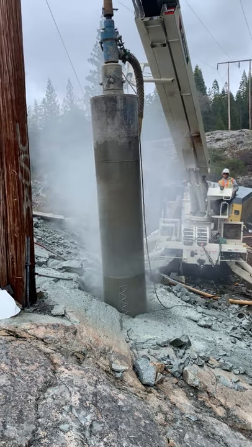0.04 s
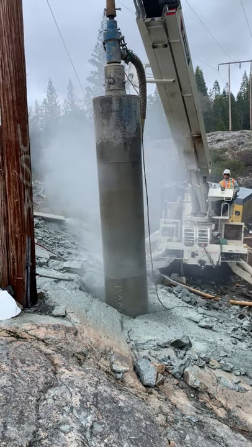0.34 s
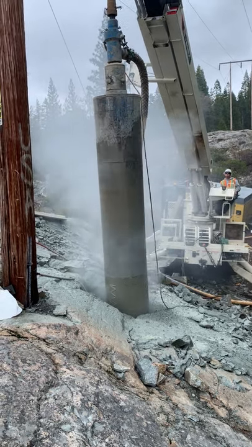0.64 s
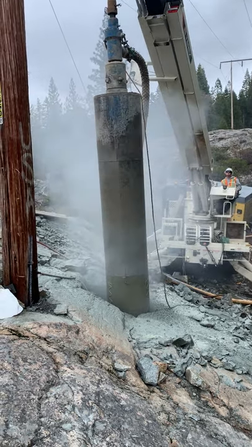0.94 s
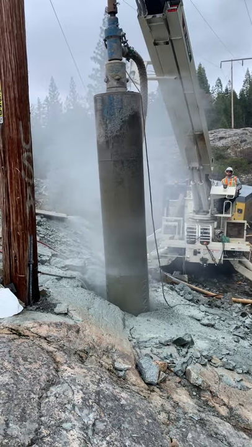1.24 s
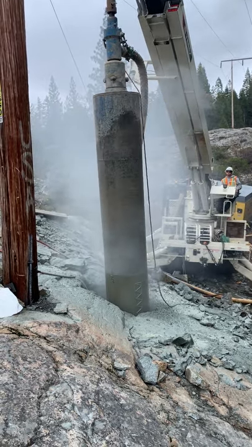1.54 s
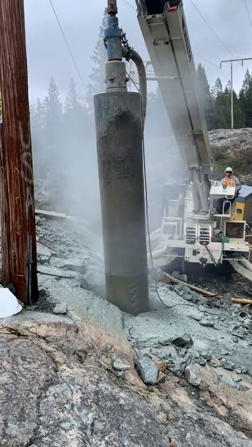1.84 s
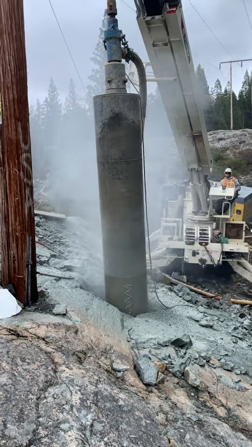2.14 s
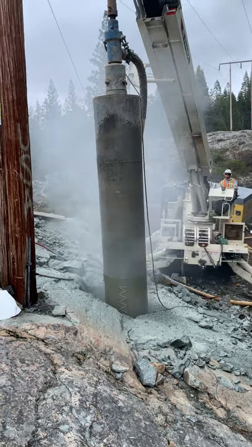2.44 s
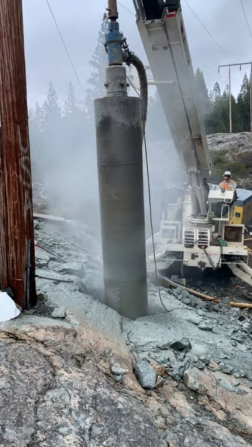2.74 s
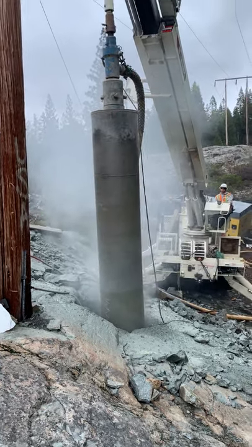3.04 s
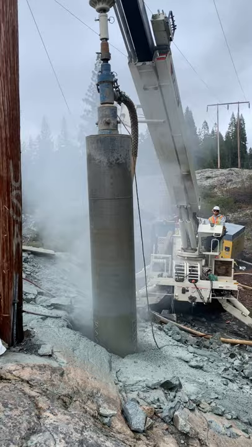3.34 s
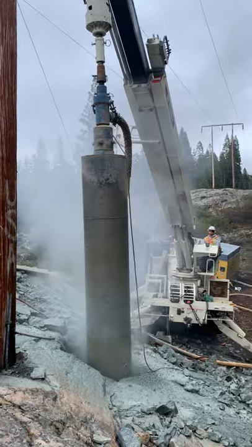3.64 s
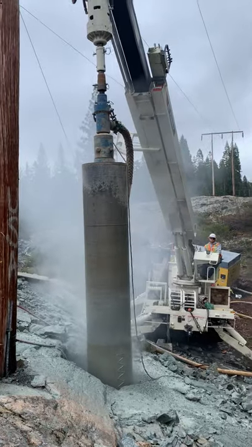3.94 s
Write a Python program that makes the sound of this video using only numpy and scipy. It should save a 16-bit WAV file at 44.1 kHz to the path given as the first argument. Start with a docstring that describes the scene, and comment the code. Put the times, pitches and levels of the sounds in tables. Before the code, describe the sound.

A large pneumatic hammer drill pounds rock outdoors for the full four seconds, about nineteen blows a second, hardest in the first 0.3 seconds. The blows boom and crunch, with rattling, ringing steel, irregular hollow knocks and short hisses. Compressed air roars underneath with a diesel drone and faint hydraulic whine. Brief thin metal scrapes sound near the start, between 1 and 1.4 seconds, and around 3.4 seconds.

```python
"""A large pneumatic hammer drill pounds rock outdoors, about 19 blows a second with weaker rebounds.
Each strike sends a bending wave down the steel casing (a falling chirp), booms through the ground,
cracks rock and rattles the steel. Hollow knocks sound on and between the blows, and scrapes make
the casing sing. Underneath, compressed air roars, a diesel drones and the hydraulics whine.
Two closely spaced microphone ports pick it all up."""
import sys
import numpy as np
from scipy import signal
from scipy.fft import rfft, irfft, next_fast_len
from scipy.io import wavfile
from scipy.ndimage import uniform_filter1d, minimum_filter1d, map_coordinates

SR = 44100
rng = np.random.default_rng(int(sys.argv[2]) if len(sys.argv) > 2 else 0)


def log_audio(samples):
    """Write samples as a 16-bit WAV file to the path given in sys.argv[1]."""
    # one column per channel
    frames = np.atleast_2d(samples).T
    # limit to full scale, then quantise
    limited = np.clip(frames, -1, 1)
    pcm = np.round(limited * 32767).astype(np.int16)
    wavfile.write(sys.argv[1], SR, pcm)


N = 176400


def amp(db):
    return 10 ** (np.asarray(db) / 20)


def unit(x):
    return x / np.sqrt(np.mean(x ** 2) + 1e-20)


def along(points, hz):
    """Read (f/Hz, value) points on a log frequency axis."""
    freqs, values = np.transpose(points)
    return np.interp(np.log(hz + 1), np.log(freqs + 1), values)


def fader(points):
    """One value per sample from (t/s, value) points."""
    return np.interp(np.arange(N) / SR, *np.transpose(points))


def wobble(rate):
    """Smooth random modulation, rate knots a second."""
    position = np.arange(N) * rate / SR
    knots = rng.standard_normal(int(position[-1]) + 4)
    fine = np.arange(0, len(knots) - 1, 1 / 8)
    return np.interp(position, fine, map_coordinates(knots, [fine]))


def filtered(x, response):
    """x through a complex frequency response."""
    size = next_fast_len(N + SR // 2)
    return irfft(rfft(x, size) * response(np.fft.rfftfreq(size, 1 / SR)), size)[..., :N]


def resonate(x, modes):
    """x through a bank of resonators (f/Hz, width/Hz, level/dB)."""
    return filtered(x, lambda f: sum(amp(db) * 1j * f * width / (hz * hz - f * f + 1j * f * width)
                                     for hz, width, db in modes))


def impulses(times, db):
    """One impulse per hit."""
    samples = np.clip(np.round(times * SR), 0, N).astype(int)
    return np.bincount(samples, amp(db), N + 1)[:N]


def bursts(times, db, decay_s, attack_s=0.0016):
    """Envelope of rms 1: each hit snaps up and dies away; overlapping hits add in power."""
    t = np.arange(SR // 4) / SR
    shape = (1 - np.exp(-t / attack_s)) * np.exp(-t / decay_s)
    power = signal.fftconvolve(impulses(times, db) ** 2, shape ** 2)[:N]
    return unit(np.sqrt(np.abs(power)))


def bending_wave(force, eq, travel_s=0.002215):
    """Highs outrun lows along the casing, so each hit chirps downward; travel_s holds at 1 kHz."""
    cycles = lambda hz: 2 * travel_s * np.sqrt(hz * 1000)
    return filtered(force, lambda hz: amp(along(eq, hz)) * np.exp(-2j * np.pi * cycles(hz)))


# stereo width of the noise, side relative to mid: f/Hz, level/dB
SIDE_EQ = [(80, -31), (250, -13), (600, -10.5), (2000, -13), (3500, -8.5), (4700, -82), (7000, -53),
           (9100, -40), (12000, -9.5)]

def white():
    """Near-white stereo noise, mostly common to both ports."""
    mid, side = rng.standard_normal((2, N))
    side = filtered(side, lambda hz: amp(along(SIDE_EQ, hz)))
    return unit(mid + np.array([side, -side]))


def noise(eq):
    """Stereo noise coloured by (f/Hz, level/dB) points, then brought to rms 1."""
    return unit(filtered(white(), lambda hz: amp(along(eq, hz))))


# fader ride of the pump whine: t/s, level/dB
WHINE_FADER = [(0, -24), (.28, -27.5), (.42, -37), (1.3, -37), (2, -39), (2.6, -36), (3.3, -33.5),
               (4, -33.5)]

def pump_whine(pitch_hz=977):
    """The hydraulic pump sings a thin, wavering tone."""
    phase = 2 * np.pi * np.cumsum(pitch_hz * (1 + 0.003 * wobble(20))) / SR
    return np.sqrt(2) * amp(fader(WHINE_FADER) + 2.8 * wobble(9)) * np.sin(phase)


# partials of the diesel: multiple of the firing rate, level/dB
DIESEL_PARTIALS = [(1, 2), (2, -4.5)]
# fader ride of its drone: t/s, level/dB
DIESEL_FADER = [(0, -19), (.3, -31.5), (.6, -24.5), (1, -33), (1.3, -29), (1.7, -22.5), (2, -28.5),
                (2.4, -33.5), (2.75, -37), (3, -35), (3.25, -50.5), (3.5, -25), (3.8, -38)]

def diesel(firing_hz=114):
    """The diesel drones at a slightly unsteady speed, swelling and fading."""
    phase = 2 * np.pi * np.cumsum(firing_hz * (1 + 0.0126 * wobble(6.06))) / SR
    level_db = fader(DIESEL_FADER) + wobble(13)
    return sum(np.sqrt(2) * amp(level_db + db) * np.sin(k * phase) for k, db in DIESEL_PARTIALS)


# colour of the low bed: f/Hz, level/dB
RUMBLE_EQ = [(20, -21), (45, -12.5), (75, 5), (110, 5.5), (150, 5), (220, 3.5), (300, 5), (380, -15.5),
             (700, -31)]

def rumble():
    """A steady low rumble sits under the rig."""
    return amp(-21) * noise(RUMBLE_EQ)


# colour of the exhaust air: f/Hz, level/dB
AIR_EQ = [(20, -44), (200, -3), (600, 3.5), (850, -5.5), (1300, -1.5), (2400, -7), (4000, -7.5),
          (5000, -14), (6500, -7.5), (7800, -10.5), (9000, -14), (12000, -17), (15500, -34)]
# fader ride of its roar: t/s, level/dB
AIR_FADER = [(0, -12), (.3, -17), (.65, -18.5), (1.2, -19), (2, -18), (2.8, -18.5), (3.4, -18.5),
             (4, -19.5)]

def air_roar(puff_share=0.51):
    """Exhaust air roars out of the hole, a share of its power puffing with each strike."""
    times, _, rattle_db = np.transpose(STRIKES)
    puffs = bursts(times, rattle_db, decay_s=0.0086)
    flow = np.sqrt(1 - puff_share + puff_share * puffs ** 2)
    return amp(fader(AIR_FADER)) * flow * noise(AIR_EQ)


# scrapes of the turning bit: centre t/s, length/s, f/Hz, level/dB
BIT_SCRAPES = [(0.087, 0.022, 6970, -14), (.49, .11, 2600, -30), (1.007, .06, 1906, -29),
               (1.26, 0.11, 3270, -32), (1.37, 0.089, 1902, -27.5), (3.392, 0.13, 7194, -26.5)]

def scrapes(pitch_waver=0.0038):
    """Steel rubs on rock and a single mode of the casing sings out briefly."""
    t = np.arange(N) / SR
    phase_per_hz = 2 * np.pi * np.cumsum(1 + pitch_waver * wobble(120)) / SR
    singing = 0
    for centre, length, hz, db in BIT_SCRAPES:
        swell = np.cos(np.pi * np.clip((t - centre) / length, -0.5, 0.5))
        singing += np.sqrt(2) * amp(db) * swell * np.sin(hz * phase_per_hz)
    return singing


# early blows under which a loose steel part clangs: t/s, level/dB
CLANG_HITS = [(.096, -5), (.178, 2), (.226, -1), (.277, -5)]
# partials of the clang: f/Hz, level/dB, t60/s
CLANG_PARTIALS = [(738, -21, 0.19), (659, -13, .1)]

def clangs():
    """A loose steel part clangs near 740 Hz under the first heavy blows."""
    t = np.arange(SR // 4) / SR
    ring = sum(amp(db) * 10 ** (-3 * t / t60) * np.sin(2 * np.pi * hz * t)
               for hz, db, t60 in CLANG_PARTIALS)
    return signal.fftconvolve(impulses(*np.transpose(CLANG_HITS)), ring)[:N]


# hollow mid-pitched knocks: t/s, level/dB
KNOCK_CUES = [(0.0722, 5), (0.1756, 6), (0.2133, 2), (0.2401, 4), (0.275, 4), (0.293, -6), (0.3837, -0.5),
              (0.4933, -3), (0.5435, -2), (0.5547, 1), (0.6677, -4), (0.8244, -7), (0.8676, 3),
              (0.8827, -8), (0.9155, -3), (0.9501, -1), (0.9877, -1), (1.0412, 0), (1.1091, -1),
              (1.1631, 4), (1.2005, 3), (1.3061, 2), (1.4061, -5), (1.5256, -7), (1.6865, 1.5),
              (1.7203, -1), (1.9298, -2), (2.0038, -4), (2.046, -4), (2.0588, 0), (2.0904, -2),
              (2.1894, -6), (2.3892, 3), (2.4421, 4), (2.5554, 1), (2.786, 1), (2.8496, 0), (2.8976, 0),
              (2.9468, 2), (3.0845, -5), (3.1048, -2), (3.2097, 10), (3.3684, 3.5), (3.4443, -3),
              (3.4737, 0), (3.5448, -6), (3.6853, -1.5), (3.6974, -4), (3.7406, 0), (3.79, 0), (3.8011, -2),
              (3.9706, -3)]
# colour of a knock: f/Hz, level/dB
KNOCK_EQ = [(150, -44), (300, -7.5), (420, -9.5), (570, 3.5), (720, -9.5), (1000, -14.5), (1350, -12.5),
            (2200, -32), (4000, -70)]
# hollow note of the air in the casing: f/Hz, width/Hz, level/dB
HOLLOW_MODE = [(590, 26, 4)]

def knocks(stones_per_s=45):
    """Hollow knocks near 570 Hz land on and between the blows; loose rock clatters on the casing."""
    stone_hits = rng.random(N) < stones_per_s / SR
    clatter = stone_hits * amp(-15.5) * rng.standard_normal(N)
    wave = bending_wave(impulses(*np.transpose(KNOCK_CUES)) + clatter, KNOCK_EQ)
    return amp(25.5) * (wave + resonate(wave, HOLLOW_MODE))


# colour of a spurt of air and chips: f/Hz, level/dB
SPURT_EQ = [(20, -70), (1200, -32), (2400, 0), (3300, -5.5), (4300, 1), (5200, 1), (6700, 4.5), (8500, 4),
            (12000, -14.5), (15500, -11)]
# fader ride of the spurts: t/s, level/dB
SPURT_FADER = [(0, -33), (.3, -26), (1, -25), (2, -32.5), (3.1, -28), (3.45, -22.5), (4, -26)]

def spurts():
    """Air and chips shoot out in a short, bright hiss at each strike."""
    times, _, rattle_db = np.transpose(STRIKES)
    return amp(fader(SPURT_FADER)) * bursts(times, rattle_db, decay_s=0.0075) * noise(SPURT_EQ)


# modes of the steel casing: f/Hz, width/Hz, level/dB
CASING_MODES = [(576, 32, 9), (735, 30, -4), (878, 30, 1), (980, 18, 6), (1266, 40, 3), (1335, 30, 0),
                (1510, 30, -1), (1790, 30, -1), (1906, 30, 3), (2092, 24, 2.5), (2649, 32, 6),
                (2900, 36, -4), (3165, 32, 2.5), (3278, 32, 2), (3630, 30, -1), (4059, 60, -4),
                (4630, 60, -4), (5297, 60, -5), (5704, 40, -4), (6040, 70, -2), (6406, 70, -3),
                (6590, 70, -3.5), (6760, 70, -5), (7015, 50, 2), (7194, 70, 1), (7477, 50, 1),
                (7560, 60, -4), (8032, 60, -5)]
# fader ride of its ring: t/s, level/dB
RING_FADER = [(0, -20), (.4, -18.5), (.8, -18), (1.2, -17.5), (1.6, -17), (2.2, -18), (2.8, -18),
              (3.4, -18), (4, -18)]

def casing_ring(drive, swell_db=3.0, swell_rate=18):
    """The steel rings; as the bit turns, each mode swells and fades at random."""
    ring = 0
    for hz, width, db in CASING_MODES:
        b, a = signal.iirpeak(hz, hz / width, SR)
        ring += amp(db + swell_db * wobble(swell_rate)) * signal.lfilter(b, a, drive)
    return amp(fader(RING_FADER)) * unit(ring)


# colour of rattling steel and chips: f/Hz, level/dB
RATTLE_EQ = [(20, -60), (500, -20), (1500, 0), (2400, -8), (3300, -3), (4200, -2), (4900, -4), (5500, -4),
             (6300, 1), (7500, 1), (8500, -3), (10000, -6.5), (12000, -10.5), (15500, -11)]

def rattle(lag_s=0.00023):
    """Steel and chips clatter just after each strike and set the casing ringing."""
    times, _, rattle_db = np.transpose(STRIKES)
    grain_db = 2.55 * wobble(600) + wobble(70)
    shake = unit(bursts(times + lag_s, rattle_db, decay_s=0.022) * amp(grain_db))
    return amp(-25.5) * shake * noise(RATTLE_EQ) + casing_ring(shake * white())


# colour of crushed rock: f/Hz, level/dB
CRUNCH_EQ = [(20, -50), (60, -34), (150, 3), (270, -6), (370, -1), (580, 0.5), (800, -16), (1350, -15),
             (1900, -12), (2500, -30), (6000, -50)]

def rock_crunch():
    """Rock crumbles under each strike in a short, grainy burst."""
    times, thud_db, _ = np.transpose(STRIKES)
    grain_db = 2.7 * wobble(500)
    envelope = bursts(times, thud_db, decay_s=0.014) * amp(grain_db)
    return amp(-23.5) * unit(envelope * noise(CRUNCH_EQ))


# colour of splitting rock: f/Hz, level/dB
CRACK_EQ = [(20, -70), (450, -25), (700, -7), (1050, -2), (1350, -4.5), (1700, -9.5), (2100, -7),
            (2600, -18), (6000, -60)]

def rock_crack():
    """The rock splits at the instant of each strike, giving it a sharp front edge."""
    times, _, rattle_db = np.transpose(STRIKES)
    return amp(-28.5) * bursts(times, rattle_db, decay_s=0.004) * noise(CRACK_EQ)


# resonances of the ground under the bit: f/Hz, width/Hz, level/dB
GROUND_MODES = [(38.2, 6, -8), (82, 17, -16), (91.8, 4.6, 7), (125.7, 10.6, 2), (200.2, 35, 6),
                (264, 13, -38)]
# fader ride of the boom: t/s, level/dB
BOOM_FADER = [(0, 2), (.3, -3), (.55, -0.5), (.8, 1), (1.05, 0.5), (1.27, -0.5), (1.5, 5.5), (1.75, 3),
              (2, -4), (2.25, 3), (2.5, 0), (2.75, 5), (3, -1.5), (3.25, 0.5), (3.5, -2.5), (3.75, 3),
              (4, -2.5)]

def ground_boom(force):
    """The ground answers the force of the bit with a deep boom."""
    return amp(24 + fader(BOOM_FADER)) * resonate(force, GROUND_MODES)


# low body of the casing's bending wave: f/Hz, level/dB
THUD_EQ = [(20, -46), (45, -13.5), (100, 2), (170, -3.5), (240, -4.5), (300, 1), (355, -22), (450, -12.5),
           (580, -1.5), (690, -17), (1000, -43), (1350, -27), (2000, -71)]
# hard steel-on-steel edge of the same wave: f/Hz, level/dB
CLANK_EQ = [(300, -40), (550, -12), (750, -5), (1050, -6), (1350, -2), (1650, -10), (2000, -16),
            (2500, -18), (4000, -24), (8000, -45)]
# fader ride of the clank: t/s, level/dB
CLANK_FADER = [(0, 27), (.3, 22.5), (.7, 21), (1.2, 19), (1.7, 17), (2.2, 24), (2.8, 23.5), (3.3, 19),
               (4, 19)]
# blows and rebounds, which also trigger the noise bursts: t/s, thud level/dB, rattle level/dB
STRIKES = [(0.0168, 13.5, 20), (0.0322, 20, 11), (0.0454, 14.5, 12), (0.0607, 19, 7), (0.0844, 2, -10),
           (0.0994, 4, 1), (0.124, 7, 2.5), (0.1392, 1, -15), (0.1571, 6, 1.5), (0.1788, 8.5, 6.5),
           (0.224, 3, 1.5), (0.239, -8, -0.5), (0.2757, 2, 3), (0.2885, 6, -2), (0.3284, 0, 3),
           (0.3444, 5.5, -6), (0.3817, -7, 2), (0.4001, 4.5, -4), (0.4363, 2, 4.5), (0.461, 3, -12),
           (0.49, -1, 4.5), (0.5187, 6.5, 0.5), (0.5432, -2, 3), (0.5575, 5, -31), (0.5777, -16, -3.5),
           (0.598, 5.5, 2), (0.6124, -4, -4), (0.639, -2, -5), (0.6519, 3, -0.5), (0.6653, -5, -19),
           (0.7059, 5, 1.5), (0.7592, 8.5, 3.5), (0.8137, 9, 2), (0.837, -7, -7), (0.8679, 2.5, 0.5),
           (0.9159, 5.5, 4.5), (0.9338, -3, -6), (0.9701, 4, 1.5), (0.99, -5, -10), (1.024, 5.5, 2.5),
           (1.0756, 5, 3), (1.0944, 1, -4), (1.1238, 3, 1), (1.1476, -3, -1), (1.1723, 3, 0.5),
           (1.1999, 2, 3), (1.2191, 4, -2), (1.245, -18, 1), (1.2687, 5, 0), (1.304, 1, 4.5),
           (1.3182, 4, -15), (1.3487, -8, -1), (1.3636, -3, -4), (1.3919, 0, -1), (1.4147, -1, -1.5),
           (1.45, -4, -5.5), (1.4636, 2, 0.5), (1.5096, 5.5, 1.5), (1.5633, -2, 3.5), (1.6166, -1, 2),
           (1.647, -46, -25), (1.6657, 2, -1.5), (1.686, -32, -2.5), (1.7165, 1, 0), (1.74, -12, -7),
           (1.7597, 2, 0), (1.79, -6, -1), (1.8064, 1, 0), (1.821, -0.5, -4), (1.8449, 2.5, 1.5),
           (1.8742, 3, -2.5), (1.8976, -3, 0), (1.9291, -2, -2), (1.955, -4, 0), (1.9842, 4, -6),
           (2.0001, -9, -0.5), (2.0364, 3.5, 1), (2.0881, 1, 1), (2.1132, 1, 0.5), (2.141, -0.5, -1),
           (2.1675, -6, -5.5), (2.1929, -2, 2.5), (2.2391, 0.5, 2), (2.296, 4.5, 0), (2.346, 2.5, 2),
           (2.361, -2, -4), (2.3999, -0.5, -1), (2.4393, -3, 1.5), (2.4515, 1, -16), (2.491, -5, 0),
           (2.5039, 1.5, -18), (2.5422, -3, 2.5), (2.5562, 0.5, -15), (2.589, -20, 0.5),
           (2.6072, 1.5, -2.5), (2.6391, -8, 1), (2.66, -2, -3.5), (2.6899, -7, 0.5), (2.7086, 1.5, -1.5),
           (2.743, -1, -1), (2.762, 0, -3), (2.7953, -1, -0.5), (2.8148, 0, -4), (2.847, -6, -3.5),
           (2.8616, 3, 0), (2.9074, 3, 1), (2.9444, -4, -2.5), (2.961, -3.5, 1), (2.9971, 2, -0.5),
           (3.015, 5.5, -3), (3.0404, -5, -4), (3.0511, 1, -27), (3.0683, 7, 0), (3.121, 2, 0.5),
           (3.157, 1, -1.5), (3.1708, 1, -3), (3.2071, 6, 3.5), (3.2202, -1, -4), (3.2667, 4.5, -1.5),
           (3.3063, -16, -2), (3.3242, 3, -0.5), (3.3704, 3, 1.5), (3.4224, 3.5, -0.5), (3.4734, 1, 1.5),
           (3.5213, 3, 0.5), (3.5453, -19, -6.5), (3.5582, 0, -31), (3.573, 0, 3), (3.5865, 5, -30),
           (3.625, 5, 2.5), (3.6769, 5, 1.5), (3.689, -3.5, -31), (3.7257, -2.0, 2.5), (3.741, 0, -31),
           (3.7714, 4, 2.5), (3.7871, -1, -8), (3.819, 1, -5), (3.8321, 4.5, -0.5), (3.8683, -4, -1.5),
           (3.8883, 1.5, -0.5), (3.9181, -18, -3), (3.9384, 2, -10), (3.9664, 0, -2), (3.9868, 0, -3.5)]

def hammer():
    """Each strike thuds along the casing and shakes the ground; those that rattle most clank hardest."""
    times, thud_db, rattle_db = np.transpose(STRIKES)
    force = impulses(times, thud_db)
    thud = amp(30.5) * bending_wave(force, THUD_EQ)
    clank = amp(fader(CLANK_FADER)) * bending_wave(impulses(times, rattle_db), CLANK_EQ)
    return thud + clank + ground_boom(force)


# lead of the left port over the right: f/Hz, phase/rad
PORT_LEAD = [(300, 0), (450, -.2), (600, .9), (800, 0), (1250, -.2), (1400, 1.1), (1800, 1.1), (2400, 2.3),
             (3700, 1.7), (4400, 3), (4950, 3.25), (6800, 6.28), (8800, 9.3), (9400, 9.5), (11200, 12.57),
             (12600, 15.5), (13600, 15.9), (15300, 18.85)]
# extra lead per unit of upward tilt: f/Hz, phase/rad
TILT_LEAD = [(700, -0.052), (1100, 0.79), (1700, 0.51), (2200, 1.54), (2700, 0.95), (3500, -1.3),
             (4400, -1.7), (5200, 1), (6500, 0.067)]

def microphone(site, tilt):
    """Sound reaches the two ports with a phase difference that depends on pitch and tilt."""
    lead = lambda hz: along(PORT_LEAD, hz) + tilt * along(TILT_LEAD, hz)
    right_only = np.array([[0], [1]])
    return filtered(site, lambda hz: np.exp(-1j * lead(hz) * right_only))


def scene(tilt_span_s=(2.98, 3.67)):
    """The whole rig in stereo; the image shifts near the end as the microphone tilts upward."""
    drill = hammer() + knocks() + clangs() + scrapes()
    debris = rock_crunch() + rattle() + rock_crack() + spurts()
    bed = air_roar() + rumble() + diesel() + pump_whine()
    site = drill + debris + bed
    crossfade = np.interp(np.arange(N) / SR, tilt_span_s, [0, 1])
    return (1 - crossfade) * microphone(site, tilt=0) + crossfade * microphone(site, tilt=0.6)


def record(dry, low_cut_hz=28, ceiling=0.95, limiter_s=0.0043, top_hz=15780):
    """Master chain: a low cut, a limiter on the peaks of the blows and a brick-wall high cut."""
    x = filtered(dry, lambda hz: hz ** 4 / (hz ** 4 + low_cut_hz ** 4))
    span = int(limiter_s * SR)
    safe_gain = np.minimum(1, ceiling / (np.abs(x).max(axis=0) + 1e-9))
    gain = uniform_filter1d(minimum_filter1d(safe_gain, span), span)
    return filtered(x * gain, lambda hz: hz < top_hz)


dry = scene()
out = record(dry)
log_audio(out)
```